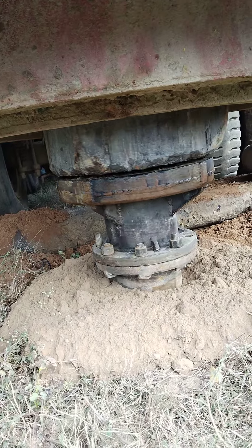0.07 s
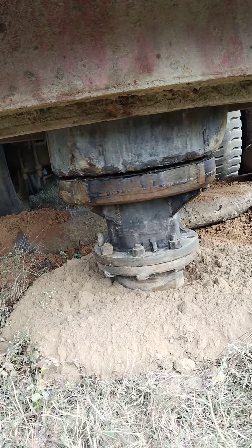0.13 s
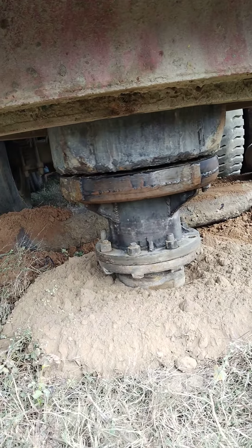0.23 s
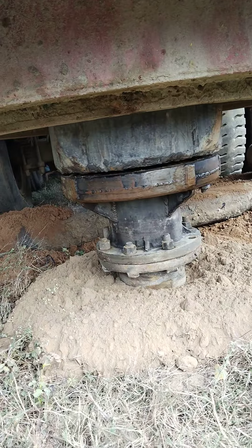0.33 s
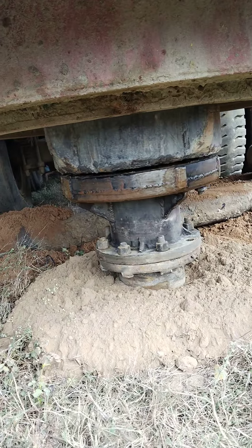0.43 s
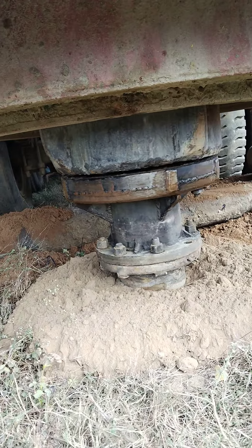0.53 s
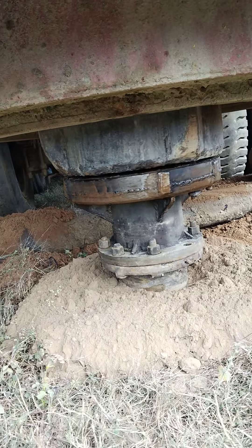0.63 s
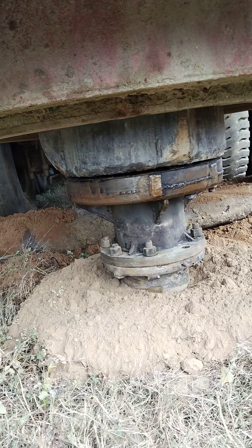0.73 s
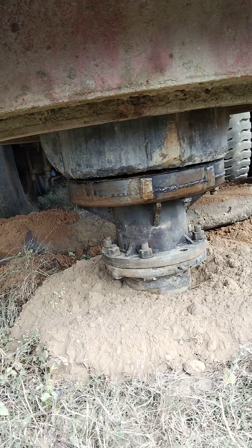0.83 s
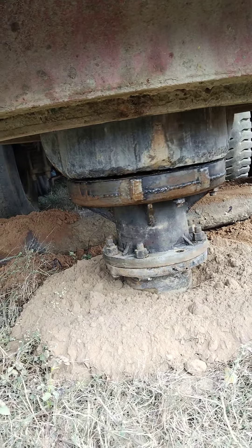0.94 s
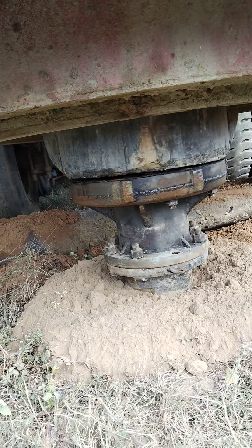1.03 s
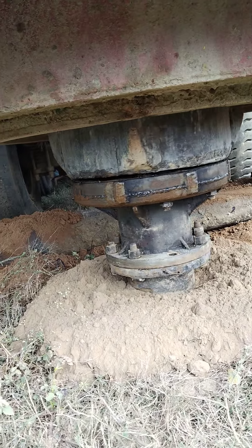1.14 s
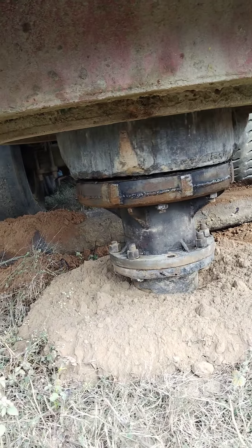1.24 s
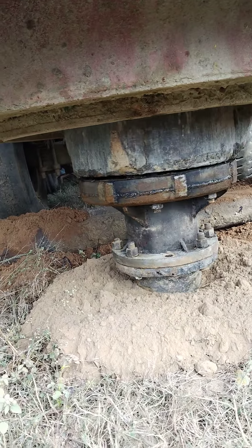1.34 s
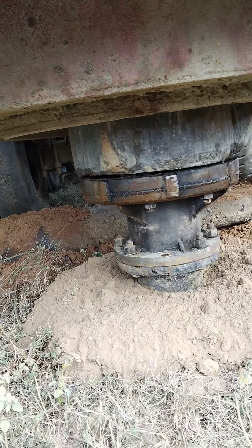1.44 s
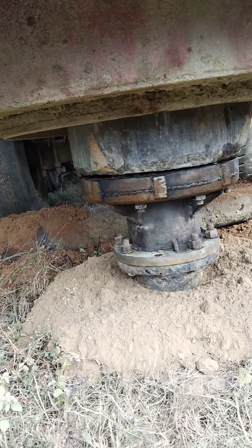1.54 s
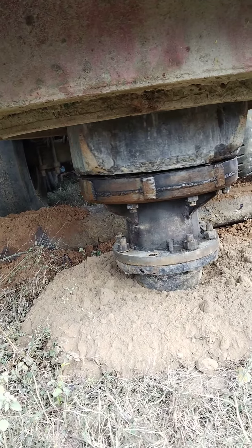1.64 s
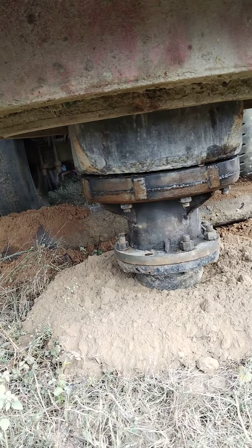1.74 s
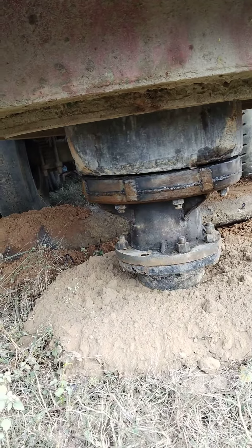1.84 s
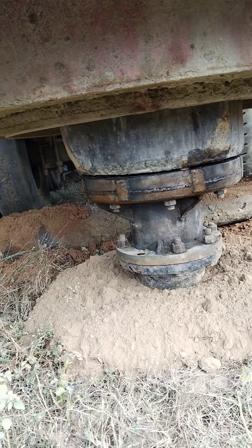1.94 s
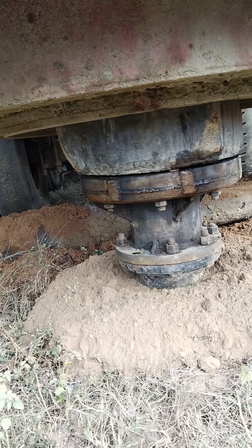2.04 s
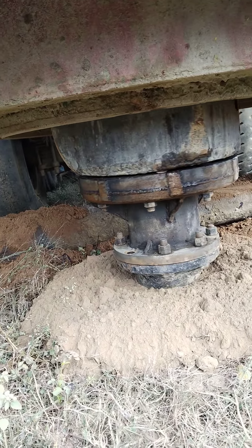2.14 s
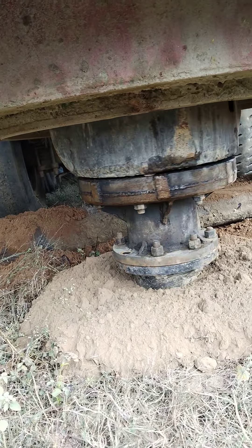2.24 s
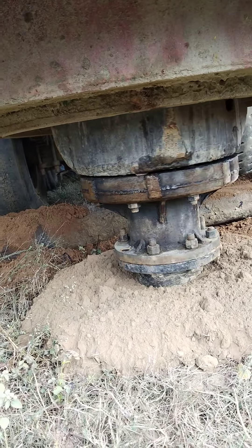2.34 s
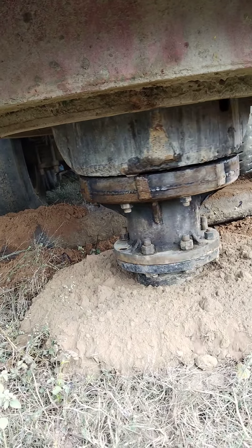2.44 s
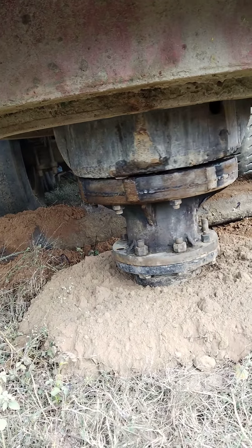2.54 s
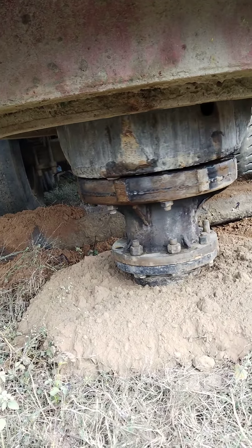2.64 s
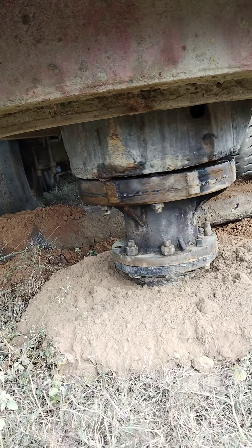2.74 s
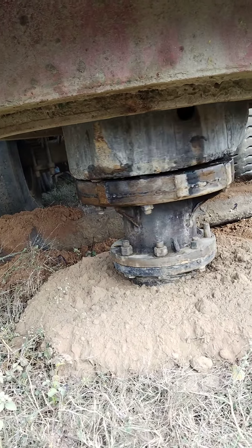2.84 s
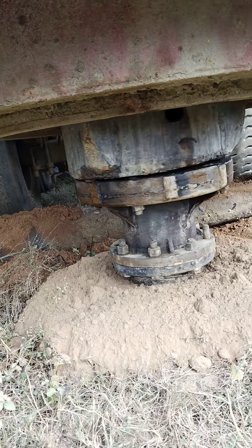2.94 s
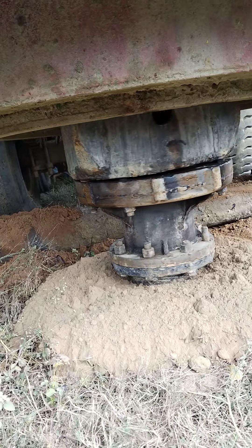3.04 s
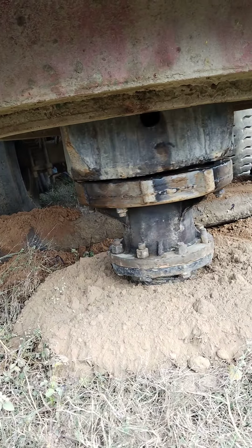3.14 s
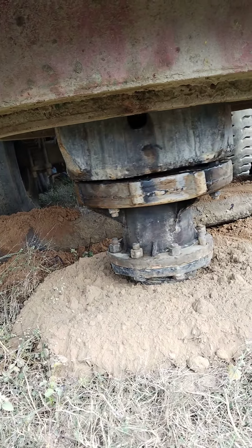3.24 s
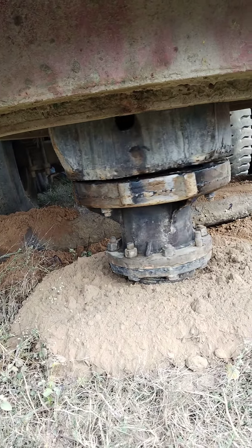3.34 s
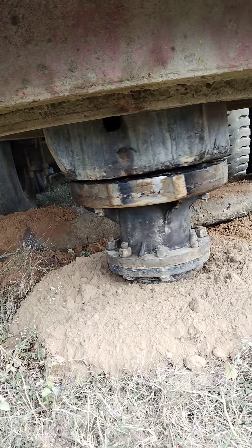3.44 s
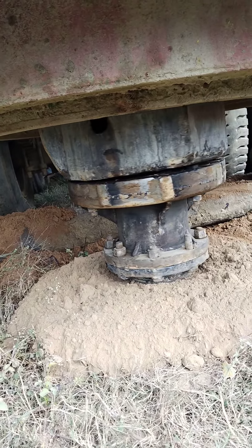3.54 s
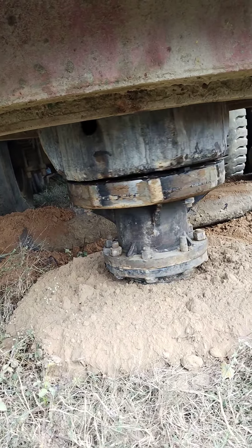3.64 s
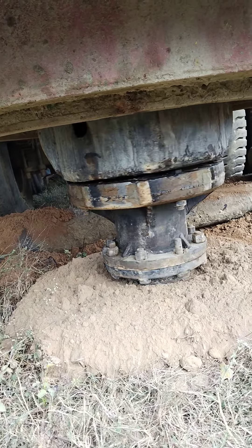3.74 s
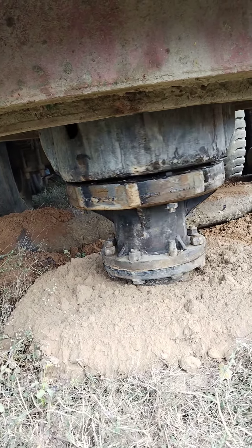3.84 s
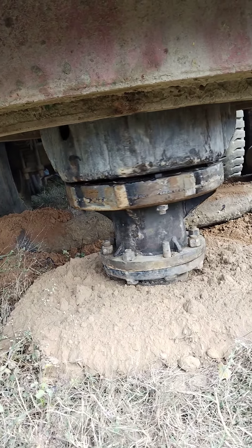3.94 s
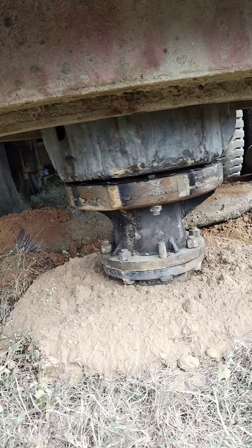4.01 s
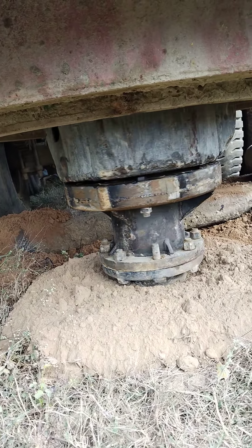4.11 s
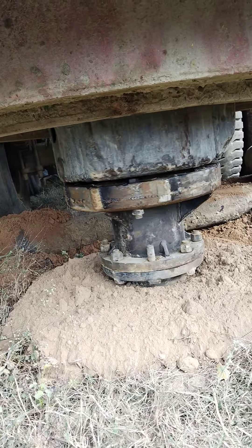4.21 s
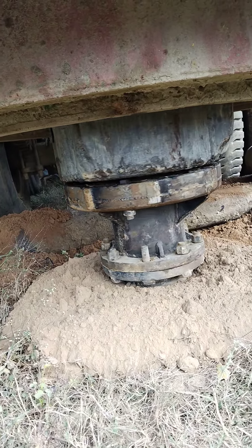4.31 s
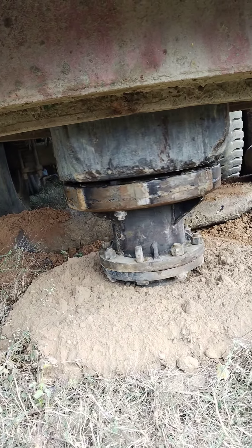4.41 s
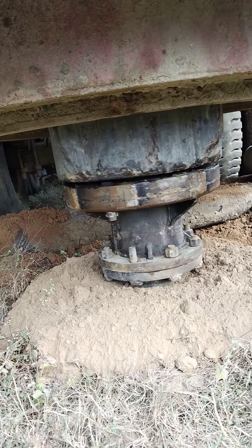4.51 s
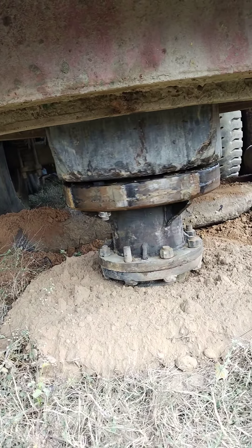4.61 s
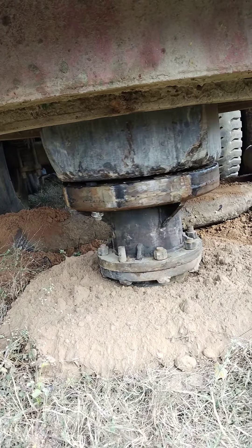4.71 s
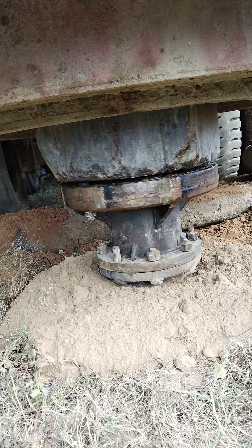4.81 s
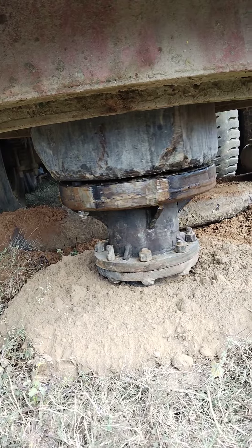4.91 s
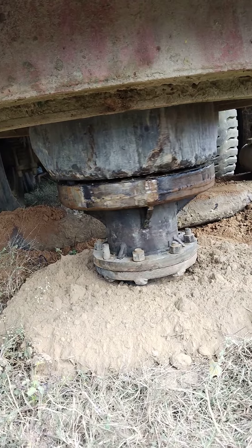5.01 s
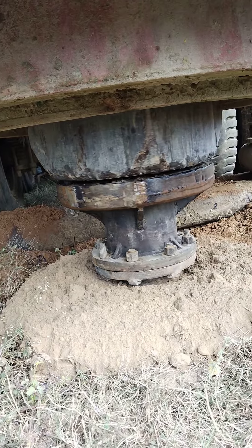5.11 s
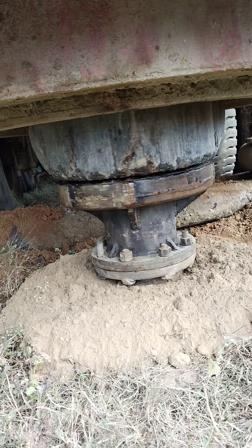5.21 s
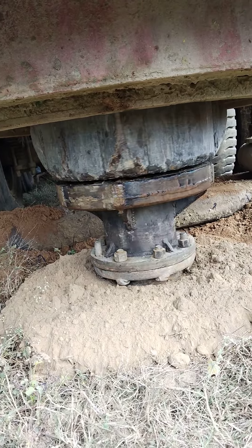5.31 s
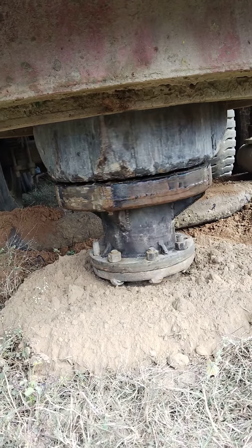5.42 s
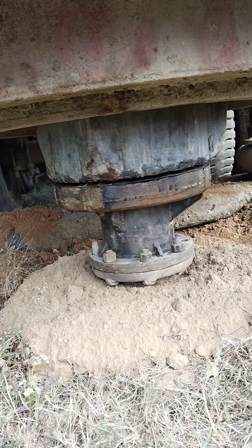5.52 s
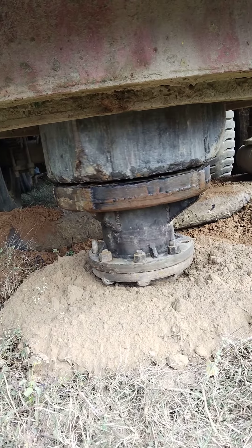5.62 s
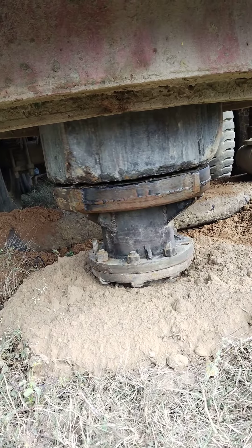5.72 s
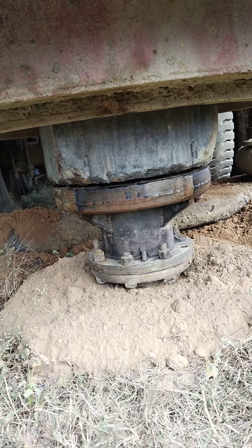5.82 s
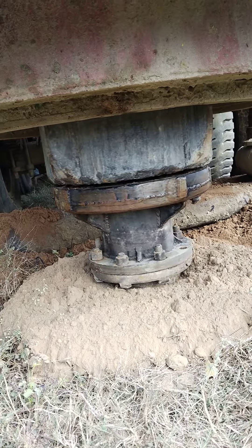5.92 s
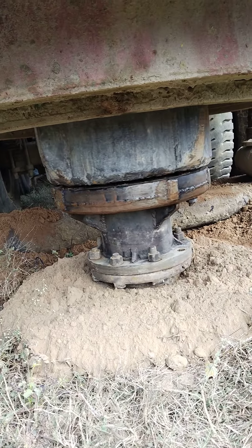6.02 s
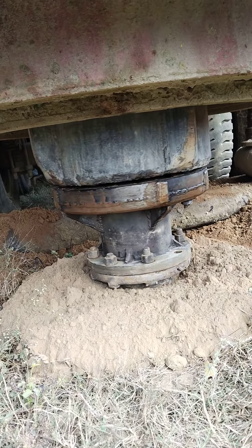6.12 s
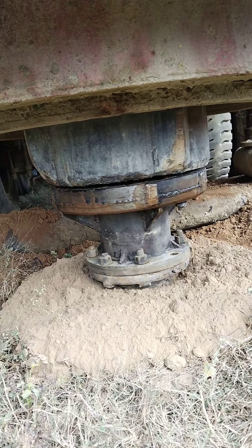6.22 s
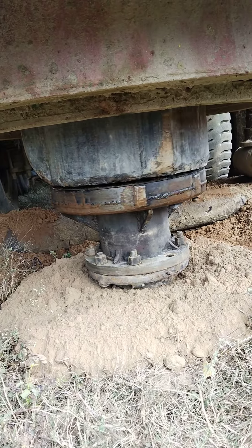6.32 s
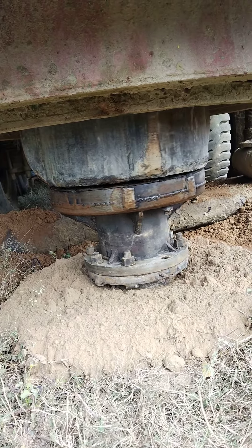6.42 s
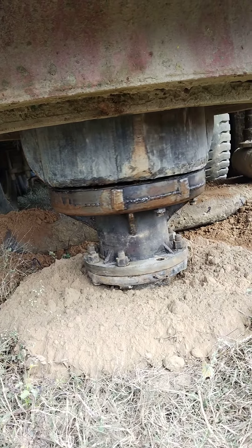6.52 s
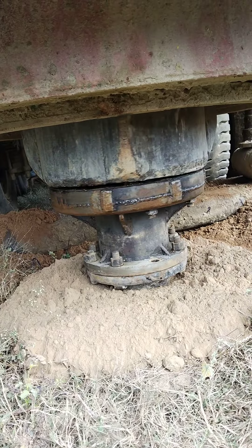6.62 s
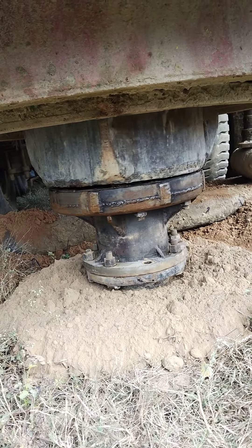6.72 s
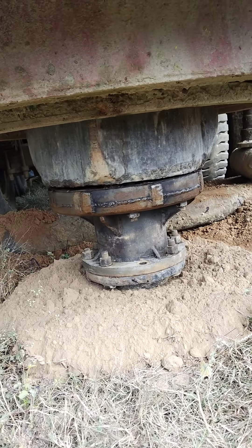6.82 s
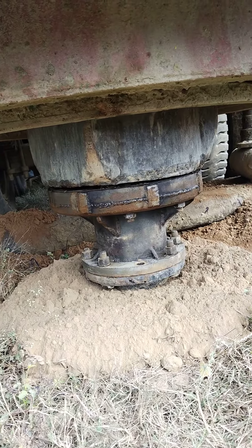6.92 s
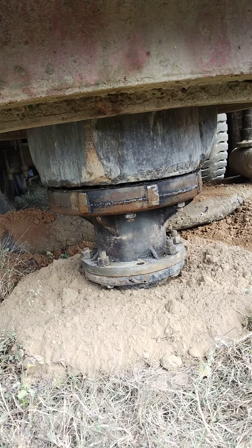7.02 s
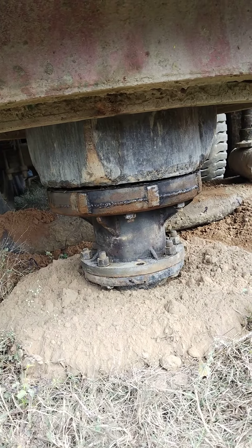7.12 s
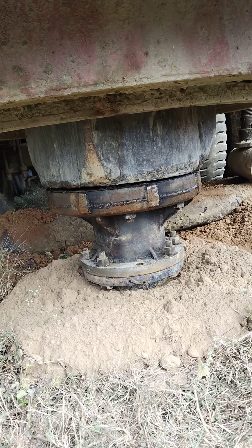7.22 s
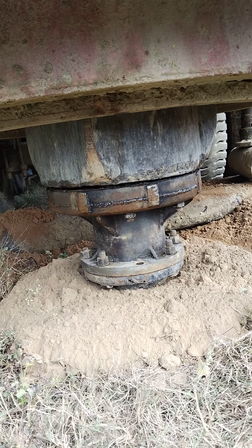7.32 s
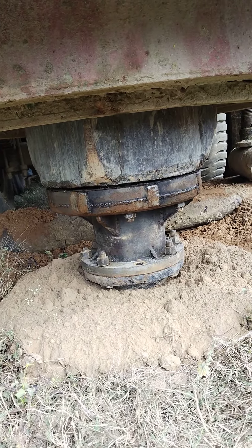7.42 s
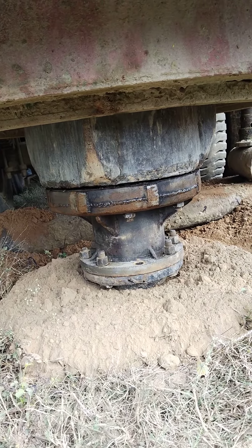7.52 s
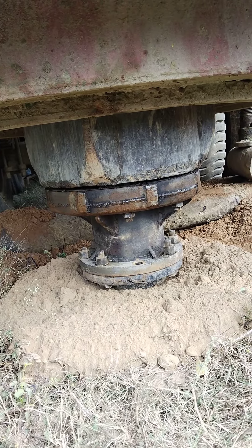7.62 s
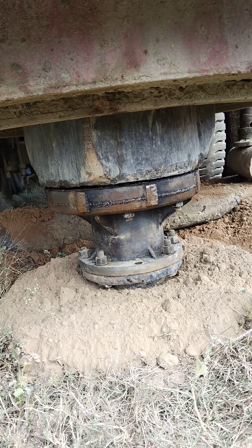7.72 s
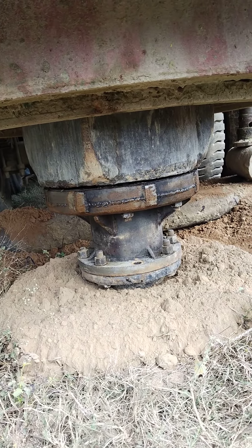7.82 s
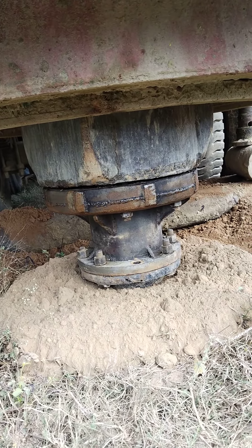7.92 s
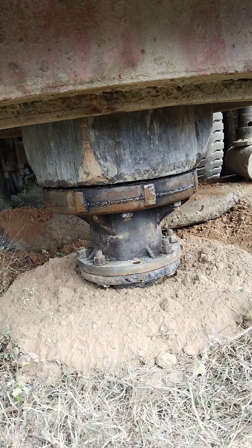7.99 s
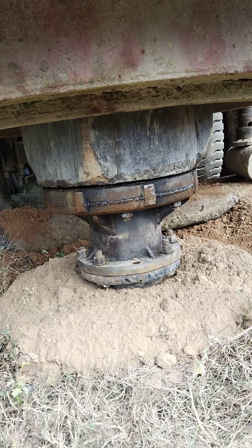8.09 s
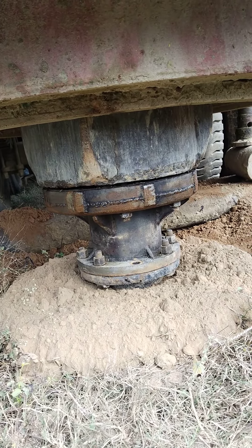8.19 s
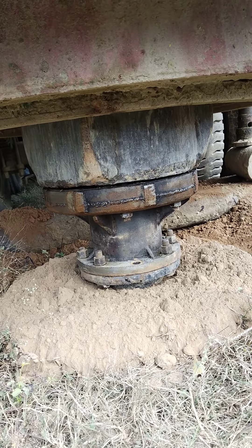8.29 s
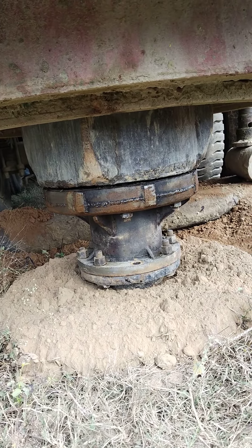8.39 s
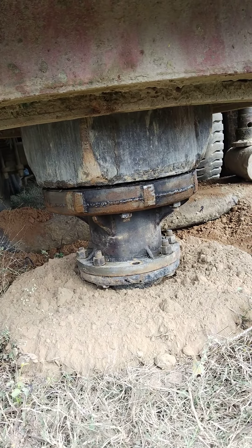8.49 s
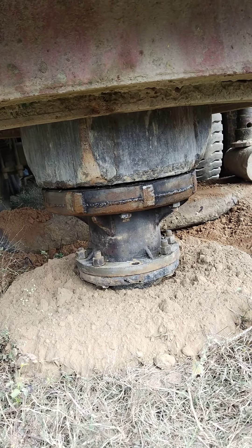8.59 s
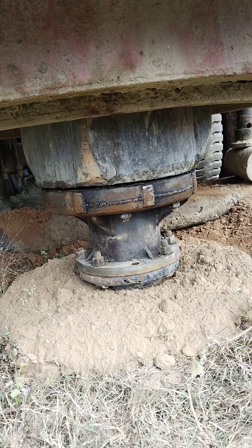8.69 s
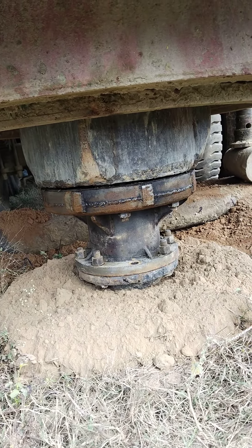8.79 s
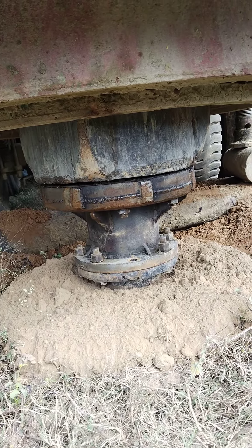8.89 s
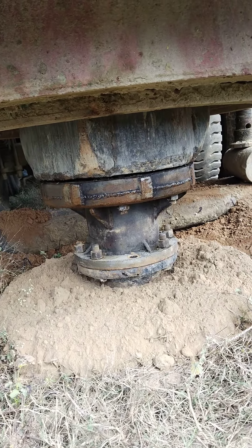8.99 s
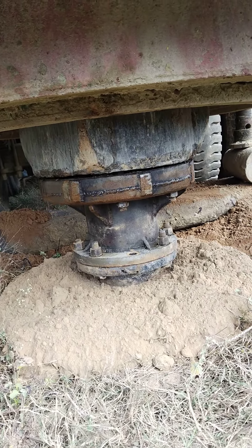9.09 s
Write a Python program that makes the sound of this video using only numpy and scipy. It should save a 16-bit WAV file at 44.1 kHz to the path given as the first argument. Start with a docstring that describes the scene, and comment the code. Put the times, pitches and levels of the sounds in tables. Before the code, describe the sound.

Outdoors, with the microphones close to a drilling rig, a diesel engine drones low at a steady speed beneath a broad compressor and machinery roar. From 0 to about 6.9 s an air hammer beats the drill string some sixteen times a second, unevenly loud, each blow ringing the steel frame with a hollow knock and short chatter over soft low thumps. Faint air hiss rises around 0.5 and 5.7 s; thin squeaks slip by near 1.2 and 5.6 s, and small loose steel clinks around 5 s. At about 6.9 s the hammering stops and the engine eases, running slightly faster. A loud, bright double clank strikes at 7.15 s, with tiny ticks after; at 7.35 s the pipe groans briefly and raggedly. Engine alone continues until 8.5 s, when a light knock leads to a heavy dull casing bump at 8.65 s with clanks and scraping; a last scrape comes at 9 s.

```python
"""Outdoors, close to a drilling rig: a diesel engine drones while an air hammer pounds the drill
string about sixteen times a second and rings the steel frame over soft low thumps; air hisses and
thin squeaks slip through. Near 7 s the hammer stops, the engine runs free, loose steel clanks and
the drill pipe groans once. After 8.5 s the casing is bumped, the frame knocks again and steel
scrapes. Ringing parts are sums of decaying modes, rubbing and air are filtered noise."""
import sys
import numpy as np
from scipy import signal
from scipy.fft import rfft, irfft, next_fast_len
from scipy.io import wavfile
from scipy.ndimage import uniform_filter1d

SR = 44100
rng = np.random.default_rng(int(sys.argv[2]) if len(sys.argv) > 2 else 0)


def wrap_up_sound(samples):
    """Save the sound to the file named by the first command line argument, as 16-bit audio."""
    columns = np.atleast_2d(samples).T
    # keep every value between -1 and 1, then stretch to whole-number steps
    tamed = np.clip(columns, -1, 1)
    steps = np.round(tamed * 32767).astype(np.int16)
    wavfile.write(sys.argv[1], SR, steps)


N = 403515
LEAD_IN = 256  # samples faded in ahead of each blow

# modes of the loose steel parts: pitch_hz, relative level_db, t60_s
STEEL_MODES = [(170, -2.5, .12), (279, 1, .1), (505, -5, .1), (554, -2.5, 0.19), (671, -3, 0.17),
               (791, -1, .12), (1000, -7, 0.14), (1305, 0, 0.087), (1440, -4.5, 0.15), (1650, -3, .15),
               (2000, -11, .1), (2340, -13.5, .1), (2600, -0.5, .07), (2830, -7.5, 0.19), (2940, -1.5, .08),
               (3150, -3, .09), (3520, -5, .1), (3800, -2.5, 0.093), (4000, -2.5, .08), (4250, -7, .17),
               (4480, -5, .13), (4770, -3.5, .08), (5160, -6.5, .09), (5800, -6.5, .07), (6730, -1.5, .07),
               (7640, -3, .07), (9200, -1.5, .06), (11000, 0.5, .07), (12800, -9, .05), (14400, -6, .05)]


def gain_of(db):
    """Decibels to gain."""
    return 10 ** (np.asarray(db) / 20)


def evened(x):
    """Scales to rms 1."""
    return x / np.sqrt(np.mean(x ** 2) + 1e-20)


def read(points, hz):
    """Reads a table on a log-frequency axis."""
    f, value = np.transpose(points)
    return np.interp(np.log(hz + 1), np.log(f + 1), value)


def add(mix, s, sound):
    """Mixes a sound in at s seconds."""
    part = mix[:, round(s * SR):][:, :sound.shape[1]]
    part += sound[:, :part.shape[1]]


def wander(count, smooth_s):
    """Random drift of rms 1, smoothed over about smooth_s seconds."""
    size = int(smooth_s * SR) + 1
    return evened(uniform_filter1d(uniform_filter1d(rng.standard_normal(count), size), size))


def resonate(x, hz, width):
    """One resonance of gain about 1, width in Hz."""
    pole = np.exp((2j * np.pi * hz - np.pi * width) / SR)
    return 2 * signal.lfilter([1 - abs(pole)], [1, -pole], x).real


def strike(modes, bands_hz, bands_db, grit_db, grit_t60_s, contact_s, rise_cycles, scatter_db, detune):
    """A blow rings the modes, low ones swelling later, under a dying grit of countless small modes.
    Two paths to the listener; the bands are coloured towards their given peak levels."""
    size = 8192
    bins, t = np.fft.rfftfreq(size, 1 / SR), np.arange(size) / SR
    hz, db, t60 = np.transpose(modes)
    hz = hz * (1 + detune * rng.standard_normal(len(hz)))

    # spectrum of decaying modes, less a faster decay that softens the onset
    phase = np.exp(2j * np.pi * rng.random((len(hz), 2)).T)
    strength = gain_of(db + scatter_db * rng.standard_normal(len(hz))) * phase
    off = 2j * np.pi * (bins - hz[:, None]) / SR
    fade = (np.log(1000) / (t60 * SR))[:, None]
    rise = (hz / (rise_cycles * SR))[:, None]
    ring = strength @ (1 / (off + fade) - 1 / (off + fade + rise)) / 2

    grit = rng.standard_normal((2, size)) * gain_of(grit_db - 60 * t / max(grit_t60_s, .01))
    grit *= np.minimum(t / contact_s, 1)
    grit *= 1 + 2.46 * np.exp(-t / .009)  # the first contact cracks hardest
    # small modes crowd near large ones
    crowd = gain_of(read(np.transpose([hz, db]), bins))
    crowd *= np.sqrt(bands_hz[1] / (np.minimum(bins, 350.) + 100))
    blow = ring + rfft(grit) * crowd

    # set the peak within 0.6 octave either side of each band centre
    near_band = np.abs(np.log2((bins + 1) / np.array(bands_hz)[:, None])) < .6
    band_peaks = np.abs(irfft(blow[:, None] * near_band, size)).max(axis=2).mean(axis=0)
    peak_db = 20 * np.log10(band_peaks)
    colour_db = read(np.transpose([bands_hz, bands_db - peak_db]), bins)
    # blunt blows carry no more treble, nor deeper bass: slopes in dB per octave
    colour_db -= 22.0 * np.maximum(np.log2((bins + 1) / bands_hz[-1]) - .6, 0)
    colour_db -= 16.0 * np.maximum(np.log2(bands_hz[0] / (bins + 1)) - .5, 0)
    blow = np.roll(irfft(blow * gain_of(colour_db), size), LEAD_IN, axis=1)
    fade_in = np.minimum(np.arange(size) / LEAD_IN, 1) ** 2
    fade_out = signal.windows.tukey(2 * size, .2)[size:]
    return blow * fade_in * fade_out


def hammer():
    """Blows run up the drill string and ring the frame modes; loose parts chatter after each."""
    # blows on the frame: start_s, ring peak_db, then against the ring: knock_db, rattle_db
    blow_table = [(0.039, -22, 3, -25.5), (0.081, -17.5, 5.5, -20.5), (0.144, -14.5, -1.5, -23),
                  (0.216, -18.5, -0.5, -18.5), (0.282, -19.5, 1, -26), (0.322, -24, -4.5, -25),
                  (0.366, -36.5, 11, -27.5), (0.445, -12.5, -2, -19), (0.511, -29.5, 0, -12.5),
                  (0.575, -25, 2, -7.5), (0.65, -29, 6.5, -13), (0.699, -17.5, 0, -24.5),
                  (0.767, -21.5, -2.5, -29), (0.83, -25, 4.5, -12), (0.889, -31, 8, -28.5),
                  (0.936, -16, 5, -35), (1.0, -17.5, 0.5, -22), (1.073, -20, 3, -18),
                  (1.12, -23.5, 7.5, -15), (1.192, -30.5, 0.5, -15), (1.238, -12, 4, -23),
                  (1.306, -24, 5.5, -30.5), (1.369, -29.5, 9.5, -17), (1.43, -26, 10.5, -14),
                  (1.545, -13.5, -1, -25), (1.631, -22.5, 1, -25), (1.678, -21, 6, -20),
                  (1.73, -17, 3, -37), (1.794, -9.5, 0.5, -32), (1.856, -23.5, 9, -31),
                  (1.934, -36.5, 5.5, -20), (1.987, -12.5, -1, -21), (2.041, -17.5, 1, -30.5),
                  (2.108, -23.5, 4, -38), (2.167, -21, 10, -30.5), (2.219, -22, 6.5, -23),
                  (2.286, -20, -1.5, -18.5), (2.351, -20, 3, -26), (2.412, -21.5, 8, -28),
                  (2.489, -26, -1.5, -31), (2.537, -23, 6.5, -17.5), (2.59, -13.5, -3.5, -29.5),
                  (2.657, -24.5, 3, -24), (2.71, -25.5, 10.5, -16), (2.784, -19, 3, -28),
                  (2.846, -21, -7, -23), (2.898, -17, 0.5, -29), (2.956, -20.5, 6, -19.5),
                  (3.018, -20, 5, -30.5), (3.068, -18.5, 1, -22.5), (3.148, -27.5, 10.5, -31),
                  (3.206, -19, -1.5, -22), (3.26, -14, 3, -25.5), (3.341, -22, 2, -30), (3.4, -22, 5, -23),
                  (3.466, -23.5, 4, -25), (3.511, -14.5, 1.5, -24.5), (3.562, -18.5, 6.5, -18.5),
                  (3.643, -30, -1, -23), (3.693, -22, 2, -29), (3.748, -18.5, 2, -31.5),
                  (3.816, -22, 3, -23.5), (3.869, -24, 15.5, -16.5), (3.927, -21.5, 1.5, -22),
                  (4.002, -29, 9.5, -22), (4.062, -30, 7.5, -25.5), (4.122, -19, 5, -37),
                  (4.197, -21, 0.5, -27), (4.288, -16, 2.5, -23.5), (4.363, -25.5, 6.5, -25.5),
                  (4.413, -32.5, 17, -19), (4.492, -27.5, 2, -16), (4.606, -18, 5, -26),
                  (4.667, -20, 6.5, -29), (4.715, -35, 7.5, -27), (4.785, -23, 8.5, -15.5),
                  (4.841, -17, 5, -25), (4.908, -14, -3, -30.5), (4.99, -24, -3.5, -14.5),
                  (5.058, -25, 9, -19), (5.098, -17, 4, -23), (5.165, -24, 7, -30.5),
                  (5.217, -13.5, 3, -20), (5.275, -21, 5, -20), (5.345, -37, 11, -20), (5.409, -17, 0, -25),
                  (5.462, -19, 0.5, -25.5), (5.532, -13.5, 0.5, -28), (5.571, -31, 10.5, -22.5),
                  (5.635, -20, 4.5, -23), (5.695, -20.5, 1.5, -18), (5.774, -19.5, -2, -21),
                  (5.833, -17, 3, -20.5), (5.903, -24, 10, -22), (6.013, -26, 4.5, -26.5),
                  (6.082, -26.5, 9.5, -12.5), (6.129, -11.5, 4, -23.5), (6.215, -29.5, 8, -17),
                  (6.269, -16, 0.5, -26), (6.313, -19.5, 6, -24), (6.378, -31, 13, -23),
                  (6.442, -28, 16.5, -19), (6.485, -18, 3, -18), (6.557, -21, 1, -28.5),
                  (6.626, -28, 1.5, -25), (6.685, -16, 8, -18.5), (6.77, -25.5, 8, -20.5),
                  (6.882, -22.5, -1, -21.5), (4.252, -22, 8.5, -24.5), (4.432, -31, 15, -18.5),
                  (6.801, -15.5, 2, -23), (8.519, -28, -2, -13), (8.653, -21.5, 10.5, -18.5),
                  (8.665, -19, -1.5, -11), (8.695, -25, -0.5, -9.5)]
    # steel frame modes: pitch_hz, relative level_db, t60_s
    frame_modes = [(117, -9, 0.036), (134.3, -3.5, 0.27), (159, -3, 0.17), (208.8, 6, 0.12),
                   (258, 10, 0.15), (297, 6.5, 0.09), (359.5, 5, 0.081), (418, 3, 0.086), (494, 1, .06),
                   (570.8, -2, 0.16), (661, -3.5, 0.038), (782, 4.5, 0.1), (898, -9, 0.099),
                   (997, 3.5, 0.13), (1190, 2, 0.16), (1435, 2.5, 0.17), (1750, 0, 0.21), (2073, 8.5, 0.13),
                   (2330, 4.5, 0.17), (2720, -4, 0.18), (3400, -5.5, 0.017), (3930, -5.5, 0.27)]
    # band centres of deep modes, knock, ring, rattle: centre_hz
    frame_bands_hz = [130, 280, 650, 2300]
    deep_db, deep_scatter_db = -9, 4.  # the lowest modes, against the knock
    rebound_s, rebound_hz, rebound_db = (.003, .04), 1000, -3.5  # range of delays, lowest pitch, level
    prompt = .7  # share of the treble heard at once

    out = np.zeros((2, N))
    thin = signal.butter(2, rebound_hz, "highpass", fs=SR, output="sos")
    scatter = deep_scatter_db * rng.standard_normal(len(blow_table))
    for (s, db, knock_db, rattle_db), low_db in zip(blow_table, scatter):
        levels_db = db + np.array([knock_db + deep_db + low_db, knock_db, 0, rattle_db])
        blow = strike(frame_modes, frame_bands_hz, levels_db, grit_db=15.8, grit_t60_s=0.14,
                      contact_s=0.0029, rise_cycles=0.64, scatter_db=2.63, detune=.04)
        bright = signal.sosfiltfilt(thin, blow)
        start_s = s - LEAD_IN / SR
        add(out, start_s, blow - (1 - prompt) * bright)
        for delay_s in rng.uniform(*rebound_s, size=3):
            add(out, start_s + delay_s, gain_of(rebound_db) * bright)
    # a broad resonance makes the knocks fuller
    out += gain_of(-6) * resonate(out, hz=280, width=240)
    return out + thumps()


def thumps():
    """Soft low tones swell and die, most under the hammering, two with the late bumps."""
    # thumps: start_s, peak level_db
    thump_table = [(0.043, -12), (0.28, -15.5), (0.443, -10.5), (0.611, -12.5), (0.697, -12), (0.85, -13),
                   (0.891, -10.5), (1.109, -10.5), (1.188, -16), (1.259, -8), (1.392, -11.5),
                   (1.448, -10.5), (1.696, -14), (2.013, -20), (2.21, -13), (2.328, -13), (2.39, -17),
                   (2.442, -16), (2.826, -13.5), (2.874, -13), (2.978, -14), (3.077, -16.5), (3.585, -10.5),
                   (3.668, -17), (3.766, -13), (3.899, -12.5), (4.1, -13.5), (4.286, -13), (4.467, -11.5),
                   (4.518, -14.5), (4.609, -14), (4.706, -15), (4.758, -18), (4.802, -17.5), (4.911, -14),
                   (5.244, -9.5), (5.293, -15.5), (5.468, -10.5), (5.577, -12.5), (5.839, -12),
                   (6.01, -12.5), (6.167, -11), (6.267, -13), (6.477, -12.5), (6.683, -9.5), (6.812, -12),
                   (8.507, -15.5), (8.652, -8)]
    pitch_hz, spread_hz, rise_s = 122.7, 6.2, 0.008

    out = np.zeros((2, N))
    t = np.arange(SR // 8) / SR
    u = t / rise_s
    swell = u * np.exp(1 - u)  # peaks at 1
    for s, db in thump_table:
        hz = pitch_hz + spread_hz * rng.standard_normal()
        phase = 2 * np.pi * rng.random((2, 1))
        add(out, s, gain_of(db) * swell * np.sin(2 * np.pi * hz * t + phase))
    return out


def engine():
    """Firing tones on one shaft speed, over the broad roar of fan, compressor and gears."""
    # the engine speeds up when the hammer stops: time_s, firing_rate_hz, load_db on the machinery
    engine_course = [(0, 54.37, 8), (0.301, 54.31, 5), (6.801, 54.29, 5), (7.1, 54.94, -1.5),
                     (7.501, 55.86, -1.5), (8.5, 55.82, -0.5), (9.15, 55, 0.5)]
    # weaker engine orders: multiple of the firing rate, level_db
    weak_orders = [(1.5, -37), (2.5, -43.5), (3, -35.5), (4, -56), (4.5, -44.5), (5, -44)]
    # colour of the roar: pitch_hz, relative level_db per Hz
    roar_colour = [(30, -29.5), (50, -15), (120, -7), (210, -17.5), (270, -14), (360, -27), (500, -31),
                   (1000, -32.5), (2100, -43.5), (4900, -57), (5600, -63), (7500, -70.5), (11000, -70.5),
                   (15500, -78.5)]
    # how much the roar follows the load: pitch_hz, share of the load dB
    load_share = [(100, 0.8), (300, 1.75), (700, 0.76), (2000, 0.12), (8000, 0.071)]
    firing_db, octave_db, roar_db = -21.5, -26, -24

    s, rate_hz, loads_db = np.transpose(engine_course)
    hz = np.interp(np.arange(N) / SR, s, rate_hz)
    angle = 2 * np.pi * np.cumsum(hz) / SR
    tones = gain_of(firing_db + 2.3 * wander(N, 0.023)) * np.sin(angle)
    tones += gain_of(octave_db + 2.4 * wander(N, 0.01)) * np.sin(2 * angle - .68)
    for multiple, db in weak_orders:  # these waver at random in level and phase
        level = gain_of(db + 3.5 * wander(N, .03))
        tones += level * np.sin(multiple * angle + 0.5 * wander(N, 0.035))

    # the roar is noise built frame by frame, with smooth patches of louder and softer
    frames, bins = N // 256 + 5, np.fft.rfftfreq(1024, 1 / SR)
    a, b, c, d, patches = rng.standard_normal((frames, 513, 5)).T
    patches = evened(uniform_filter1d(uniform_filter1d(patches, size=10, axis=0), size=8, axis=1))
    spectrum = np.array([a + 1j * b, c + 1j * d])
    spectrum *= gain_of(read(roar_colour, bins)[:, None] + 1.1 * patches)
    load_db = np.interp(np.arange(frames) * 256 / SR, s, loads_db)
    spectrum *= gain_of(read(load_share, bins)[:, None] * load_db)
    roar = signal.istft(spectrum, nperseg=1024, noverlap=768)[1][:, :N]
    # the root of 2 makes the tone levels rms, like the roar's
    return np.sqrt(2) * tones + gain_of(roar_db) * evened(roar)


def clanks():
    """Loose steel parts knock together, left or right of the microphones; each knock favours one mode."""
    # clanks: start_s, peak_db, then against the peak: thud_db, clang_db, edge_db;
    # left_over_right_db, pitch_hz of the mode struck best
    clank_table = [(4.999, -24.5, -30, -15, -20, 1, 3800), (5.015, -32, -30, -16, -23, 0, 3800),
                   (5.0662, -29, -25, -8.5, -34, -2, 3520), (5.08, -37, -25, -6, -31, 0, 3150),
                   (5.223, -45, 5, 12, -36, 3.5, 2000), (5.2774, -54, -3, -4, 5, -1, 5900),
                   (6.131, -45, 5, 12, -2.5, 1, 11000), (6.7986, -40, -5, 2, -14, 2, 11000),
                   (7.1465, -7.5, -20, -16, -28, 0, 2940), (7.1496, -6.5, -23, -15.5, -32, -5, 3150),
                   (7.1585, -21.5, -1, 12, -19, 0.5, 1305), (7.205, -33.5, -20, -10, -36, 0, 2830),
                   (7.27, -37.5, -23, -10, -36, -3, 2940), (7.285, -42, -23, -8, -36, -2, 2600),
                   (8.583, -28.5, -20, -15, -26, 0, 3150), (8.654, -38, -1, 5, -8, 1, 7900),
                   (8.666, -32.5, -7, 3, -27, -11, 2830), (8.689, -32, -7, 0, -28, 2, 2340)]
    # band centres of thud, body, clang, peak, edge: centre_hz
    steel_bands_hz = [270, 670, 1500, 3600, 9000]
    body_db, lift_of_best_db = -8, 7  # body against the mean of thud and clang
    cluster = .014  # each mode is three close neighbours, this far apart as a share of pitch

    out = np.zeros((2, N))
    hz, mode_db, t60 = np.transpose(STEEL_MODES)
    neighbours = [[1 - cluster, 1, 1], [1, 1, 1], [1 + cluster, 1, 1]]
    for s, db, thud_db, clang_db, edge_db, pan_db, ring_hz in clank_table:
        between_db = (thud_db + clang_db) / 2 + body_db
        levels_db = db + np.array([thud_db, between_db, clang_db, 0, edge_db])
        lift_db = lift_of_best_db * (np.arange(len(hz)) == np.argmin(abs(hz - ring_hz)))
        modes = np.transpose([hz, mode_db + lift_db, t60])[:, None] * neighbours
        clank = strike(modes.reshape(-1, 3), steel_bands_hz, levels_db, grit_db=15.7, grit_t60_s=0.08,
                       contact_s=0.0028, rise_cycles=3.1, scatter_db=2.2, detune=.005)
        heard = ports(clank)[:, :clank.shape[1]]
        add(out, s - LEAD_IN / SR, heard * gain_of([[pan_db / 2], [-pan_db / 2]]))
    return out


def groan():
    """Quick slips of steel on steel, even at first, then ragged above a steady, swelling fundamental."""
    # colour of the groaning pipe: pitch_hz, relative level_db
    groan_colour = [(260, -8.5), (520, -13), (790, -15.5), (1050, 0), (1310, 0), (1600, -10), (1850, -14.5),
                    (2300, -19), (2700, -43.5)]
    start_s, length_s, pitch_hz, sag_hz_per_s = 7.354, 0.38, 261.4, 35
    level_db, rise_s, hold_s, fade_db_per_s = -23.5, .003, .095, 34.5
    stop_db_per_s, tail_db = 250.5, -11  # steeper fall after the hold, down to an after-ring
    clean_s, roughness = 0.023, .85  # even until then; final roughness
    throb_s, catch = .038, .7  # spacing and depth of the catches
    dull_db_per_s, swell_db_per_s = 8.5, 89.5  # fade per harmonic number; rise of the fundamental

    t = np.arange(0, length_s, 1 / SR)
    hz = (pitch_hz - sag_hz_per_s * t) * (1 + 0.018 * wander(len(t), 0.0028))
    angle = 2 * np.pi * np.cumsum(hz) / SR
    ragged = np.clip(roughness * np.clip(.2 + 14 * (t - clean_s), .2, 1), 0, .95)
    slips = np.zeros((2, len(t)))
    for k in range(1, 11):
        shake = np.array([wander(len(t), .0018) + 1j * wander(len(t), .0018) for _ in range(2)])
        shake /= np.sqrt(2)
        harmonic_db = read(groan_colour, k * pitch_hz) - dull_db_per_s * k * t
        if k == 1:
            harmonic_db = harmonic_db + swell_db_per_s * np.minimum(t, hold_s)
            motion = np.ones((2, 1))
        else:
            motion = np.sqrt(1 - ragged ** 2) + ragged * shake
        slips += gain_of(harmonic_db) * (motion * np.exp(1j * (k * angle + .6 * k ** 2))).real

    # it catches briefly between throbs
    throb = 1 - catch * np.cos(np.pi * t / throb_s) ** 8 * (t > throb_s / 2)
    stop_db = np.clip(stop_db_per_s * (hold_s - t), tail_db, 0)
    shape = np.minimum(t / rise_s, 1) * gain_of(level_db - fade_db_per_s * t + stop_db)
    out = np.zeros((2, N))
    add(out, start_s, shape * throb * evened(slips) * signal.windows.tukey(len(t), .02))
    return out


def bumps():
    """The heavy casing rings on after a dull bump, each mode beating with a close twin."""
    # bumps: start_s, level_db, brightness in dB per octave
    bump_table = [(8.518, -37, 0), (8.6545, -16, -2.5), (8.665, -30, 2), (8.69, -30.5, 4.5)]
    # heavy casing modes: pitch_hz, relative level_db, t60_s
    casing_modes = [(169, 12.5, 0.15), (215, 6, .1), (284, 7, .12), (350, -4, .08), (445, -17.5, 0.25),
                    (561, -10, 0.85), (686, -8.5, 0.47), (765, -10.5, .45), (843, -14, .3), (955, -7, 0.29),
                    (1050, -14, .4), (1270, -12.5, .12), (1440, -20, 0.19), (1846, -19, .2),
                    (2370, -13.5, .06)]
    twins = (1, 1 + .025)  # pitch ratios

    out, t = np.zeros((2, N)), np.arange(SR // 2) / SR
    for s, db, tilt_db in bump_table:
        for hz, mode_db, t60 in casing_modes:
            bright_db = tilt_db * np.log2(hz / casing_modes[2][0])
            shape = gain_of(db + mode_db + bright_db - 60 * t / t60)
            shape *= 1 - np.exp(-hz * t / 1.5)  # low modes swell later
            pair = sum(np.sin(2 * np.pi * (hz * twin * t + rng.random((2, 1)))) for twin in twins)
            add(out, s, shape * pair / np.sqrt(2))
    return out


def rubbed_steel(rub, lowest_hz, highest_hz, broad):
    """Friction noise excites the steel modes between two pitches; broad is width as a share of pitch."""
    total = 0
    for hz, mode_db, _ in STEEL_MODES:
        if lowest_hz < hz < highest_hz:
            rung = resonate(resonate(rub, hz, broad * hz), hz, broad * hz)
            total = total + gain_of(mode_db) * rung / np.sqrt(hz)
    return evened(total)


def scrapes():
    """Grainy friction rings the loose steel, broadly; it bites quickly and fades."""
    # steel dragged on steel: start_s, level_db, treble_db against it,
    # sing_hz (pitch that sings), sing_width_hz, sing_db against the level
    scrape_table = [(8.51, -35.5, -29, 1750, 400, -8), (8.572, -37, -17, 3300, 900, -3),
                    (8.655, -32, -20, 2950, 600, -10), (9.005, -29.5, -18, 4150, 260, -15)]
    rise_s, fade_db_per_s, length_s = 0.0089, 118, .3

    out = np.zeros((2, N))
    t = np.arange(0, length_s, 1 / SR)
    shape = np.minimum(t / rise_s, 1) ** 2 * gain_of(-fade_db_per_s * t)
    for s, db, treble_db, sing_hz, width_hz, sing_db in scrape_table:
        rub = rng.standard_normal((2, len(t))) * gain_of(0.82 * wander(len(t), 0.0029))
        low = rubbed_steel(rub, 480, 2100, broad=.12)
        high = rubbed_steel(rub, 3900, 6200, broad=.09)
        sing = evened(resonate(resonate(rub, sing_hz, width_hz), sing_hz, width_hz))
        sing *= shape  # shaped again below, so it dies twice as fast
        add(out, s, gain_of(db) * shape * (low + gain_of(treble_db) * high + gain_of(sing_db) * sing))
    return out


def squeaks():
    """Short gliding sine tones that flutter in level."""
    # thin squeaks: start_s, length_s, start_hz, end_hz, level_db
    squeak_table = [(0.495, .04, 4250, 4330, -62), (0.662, 0.067, 4060, 4300, -58),
                    (8.775, 0.062, 3820, 3850, -59), (1.161, 0.055, 2150, 1470, -43),
                    (5.58, 0.037, 2130, 1710, -45.5), (5.878, 0.018, 10000, 9800, -56),
                    (8.785, 0.016, 2480, 2560, -45)]
    out = np.zeros((2, N))
    for s, length_s, start_hz, end_hz, db in squeak_table:
        hz = np.linspace(start_hz, end_hz, int(length_s * SR))
        tone = np.sin(2 * np.pi * np.cumsum(hz) / SR)[None]
        flutter = gain_of(3.0 * wander(len(hz), .003))
        add(out, s, gain_of(db) * tone * signal.windows.tukey(len(hz), .5) * flutter)
    return out


def puffs():
    """Leaking air: hiss coloured by a small nozzle swells, sputters and dies."""
    # puffs: start_s, length_s, level_db
    puff_table = [(0.52, .35, -55.5), (5.7, .11, -59.5)]
    # nozzle resonances: pitch_hz, width_hz, relative level_db
    nozzle = [(4180, 330, -4), (4860, 190, 0), (9200, 1500, -8), (11000, 5000, -9.5)]
    out = np.zeros((2, N))
    for s, length_s, db in puff_table:
        air = rng.standard_normal((2, int(length_s * SR)))
        hiss = np.zeros(air.shape)
        for hz, width_hz, part_db in nozzle:
            hiss += gain_of(part_db) * evened(resonate(resonate(air, hz, width_hz), hz, width_hz))
        sputter = gain_of(3.5 * wander(air.shape[1], .006))
        add(out, s, gain_of(db) * evened(hiss * sputter) * np.hanning(air.shape[1]))
    return out


def ports(paths):
    """Two close microphone ports share part of the sound, with a phase lag and a level lean by pitch."""
    # left-right likeness: pitch_hz, correlation (held to 0..1 below)
    likeness = [(60, 1.05), (110, 3.5), (170, 1.16), (300, 0.66), (700, 0.34), (1400, .5), (3000, 0.42),
                (6000, 0.03), (12000, -0.26)]
    # phase by which left leads: pitch_hz, lead_rad
    left_lead = [(60, 0), (130, -.22), (260, -.5), (520, .2), (950, -2), (1400, -3), (1900, -1.6),
                 (2400, -1.4), (3100, -.6), (5000, -.3)]
    # balance: pitch_hz, left_over_right_db
    left_lean = [(60, 0), (100, 2), (160, 2), (250, -4.5), (410, -2.5), (660, -1), (1060, .6), (1710, 1.3),
                 (2760, 2.5), (4450, 0.5), (9000, -2.5)]
    size = next_fast_len(paths.shape[1] + 1024)
    hz, (near, other) = np.fft.rfftfreq(size, 1 / SR), rfft(paths, size)
    alike = np.clip(read(likeness, hz), 0, 1)
    right = alike * near + np.sqrt(1 - alike ** 2) * other
    # half of the lean and lead goes to each side
    turn = gain_of(read(left_lean, hz) / 2) * np.exp(.5j * read(left_lead, hz))
    return irfft(np.array([near * turn, right / turn]), size)


def scene():
    """All sources as heard at the two microphone ports; each clank has its own placing."""
    rig = engine() + hammer() + groan() + bumps() + scrapes() + puffs() + squeaks()
    return ports(rig)[:, :N] + clanks()


def record(dry):
    """The microphone drops the deepest bass and rounds off the highest peaks; then the band limit."""
    edge_hz = 15500
    lean = signal.sosfilt(signal.butter(3, 40., "highpass", fs=SR, output="sos"), dry)
    lean = 1.4 * np.tanh(lean / 1.4)
    band_limit = signal.firwin(511, edge_hz, window=("kaiser", 9), fs=SR)
    return signal.oaconvolve(lean, band_limit[None], "same")


dry = scene()
out = record(dry)
wrap_up_sound(out)
```